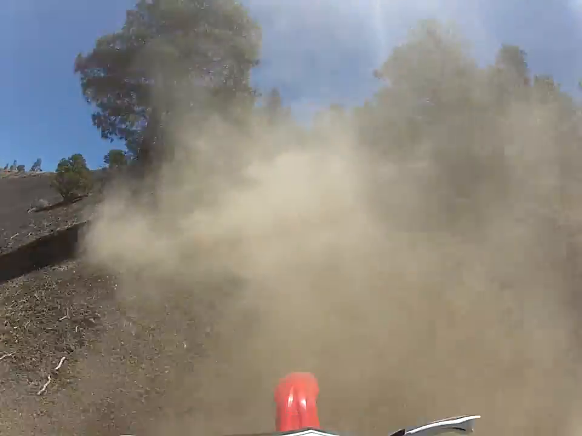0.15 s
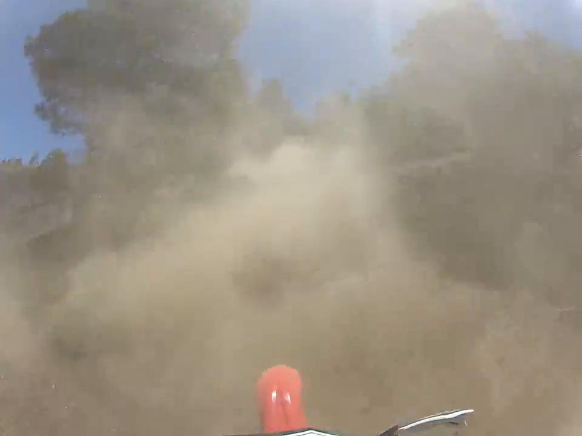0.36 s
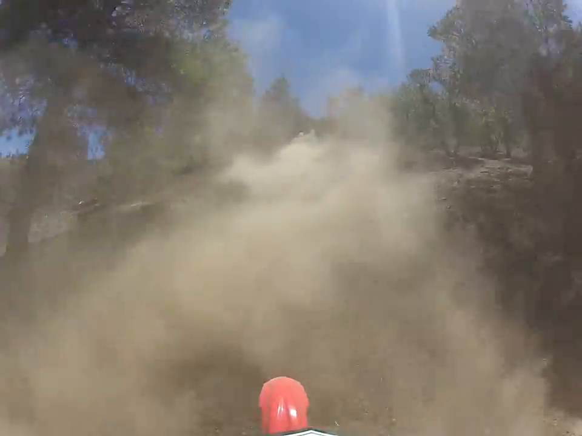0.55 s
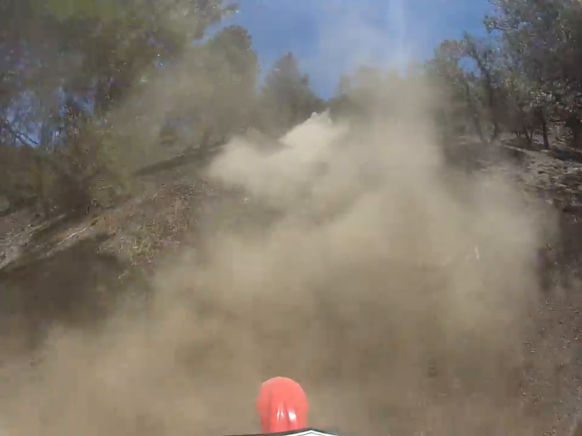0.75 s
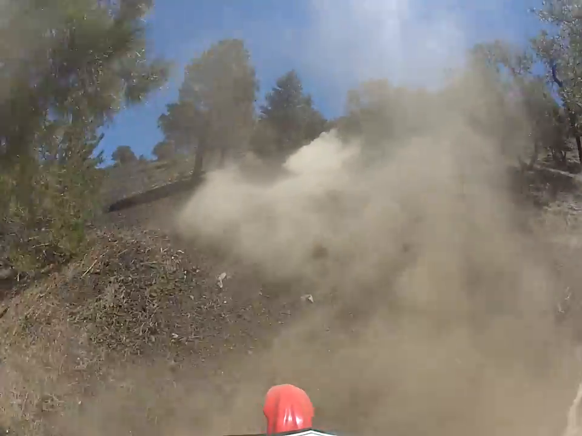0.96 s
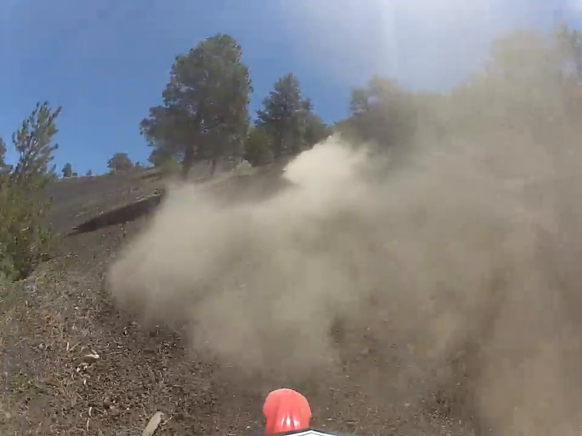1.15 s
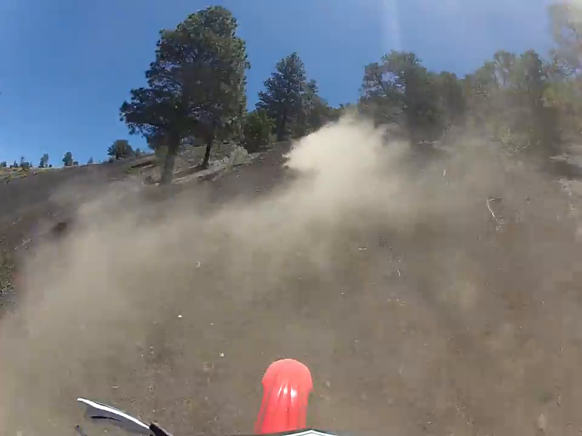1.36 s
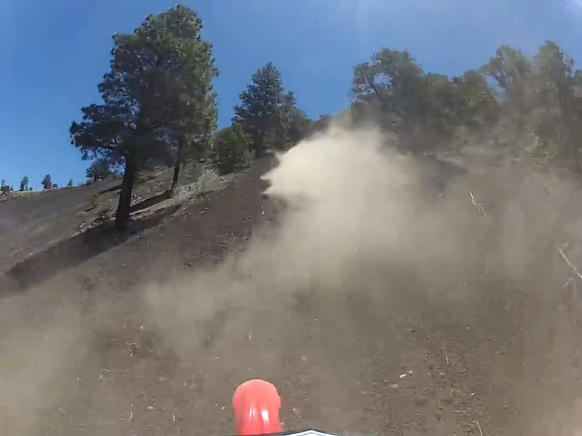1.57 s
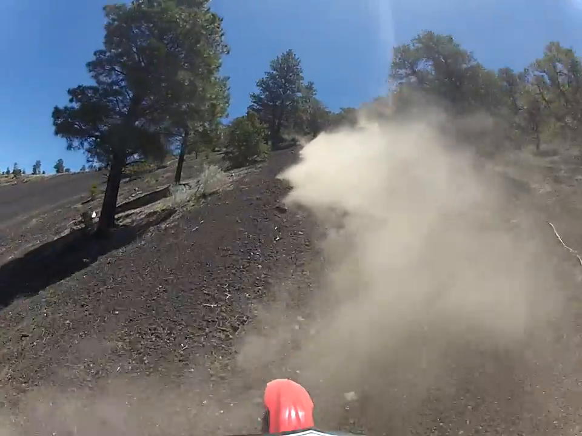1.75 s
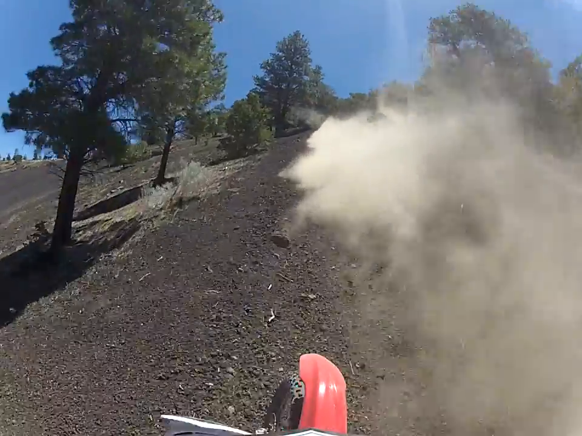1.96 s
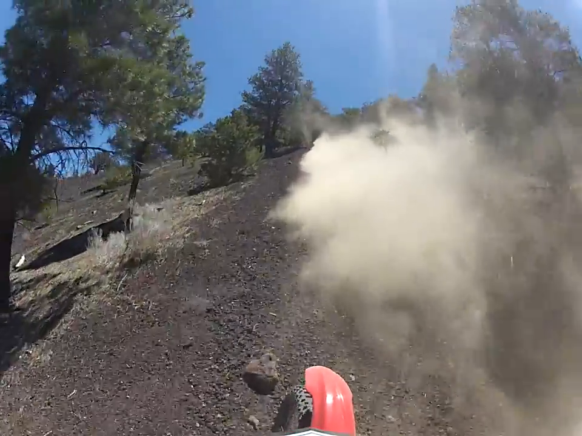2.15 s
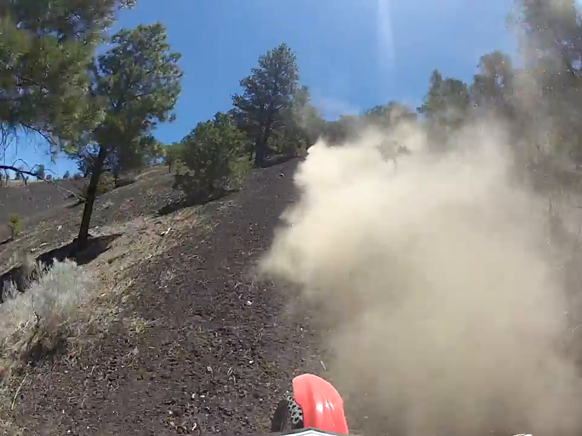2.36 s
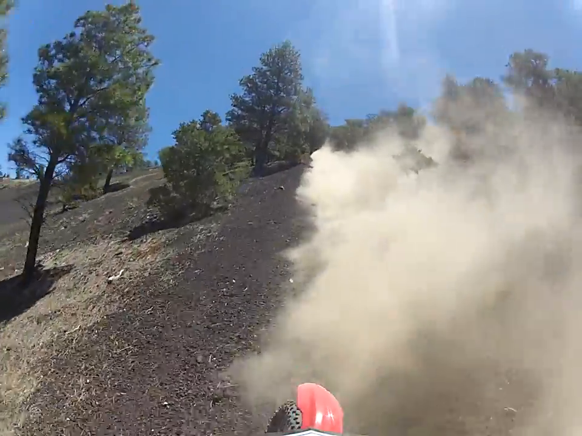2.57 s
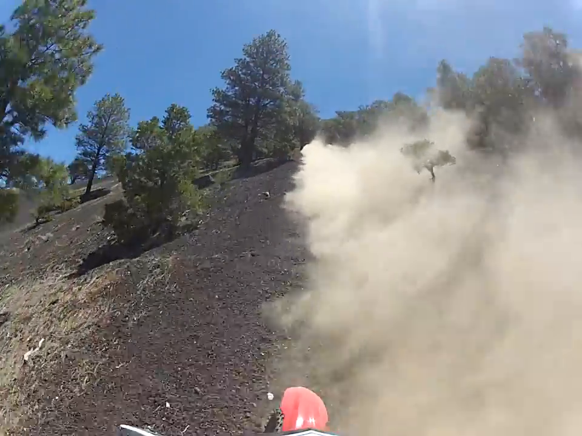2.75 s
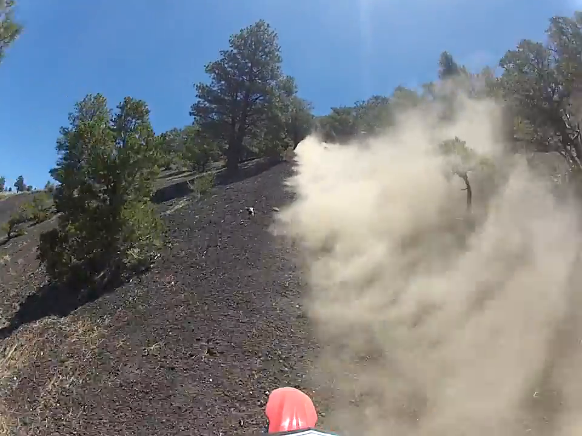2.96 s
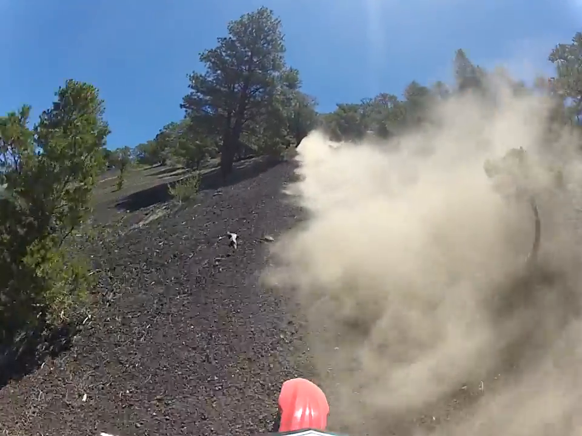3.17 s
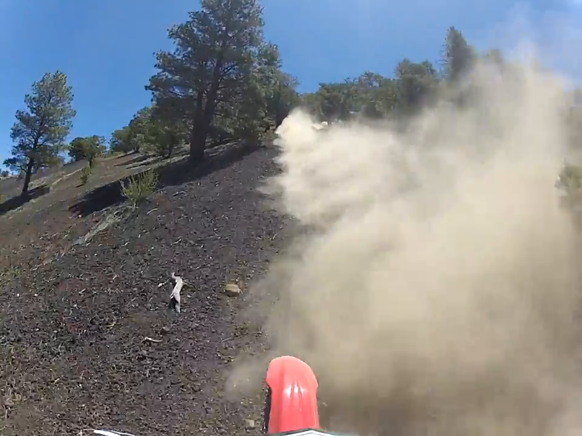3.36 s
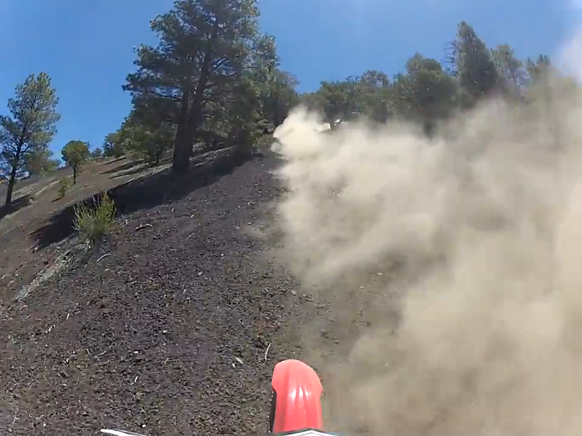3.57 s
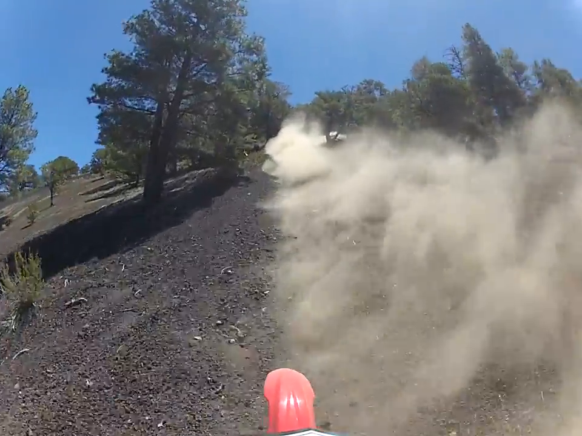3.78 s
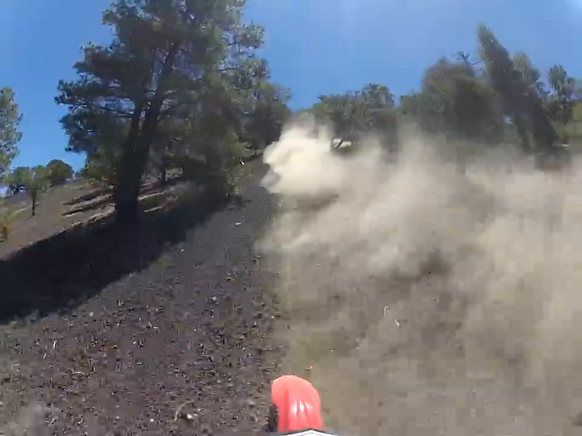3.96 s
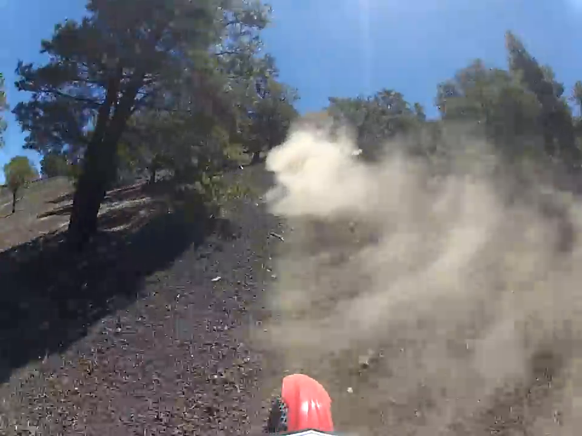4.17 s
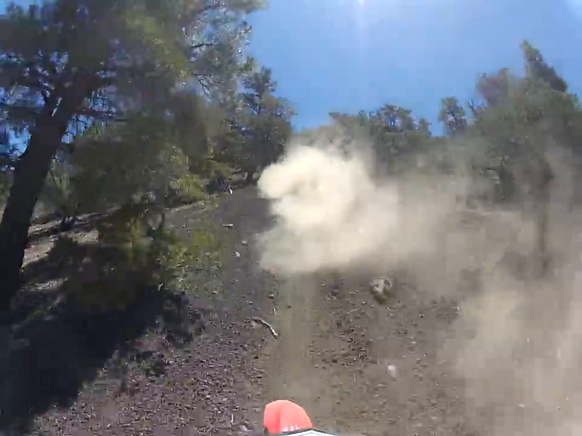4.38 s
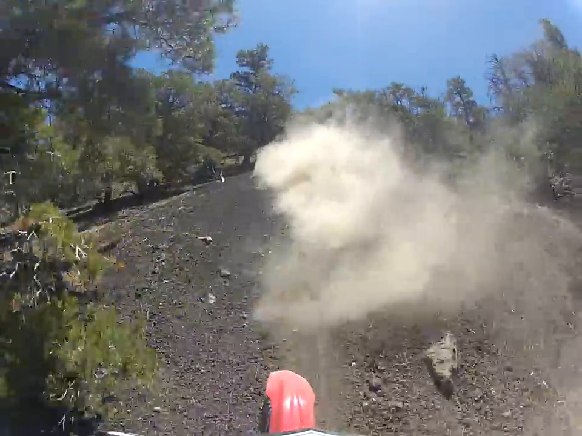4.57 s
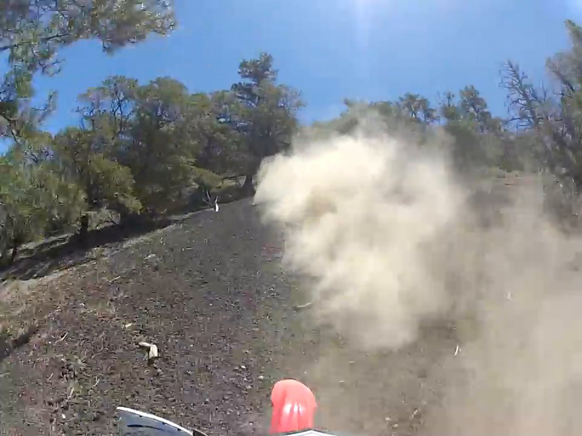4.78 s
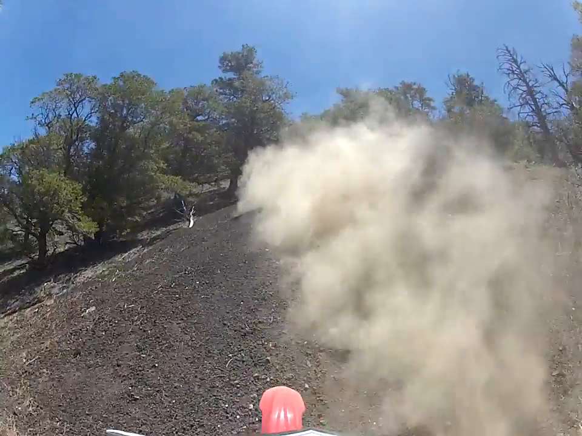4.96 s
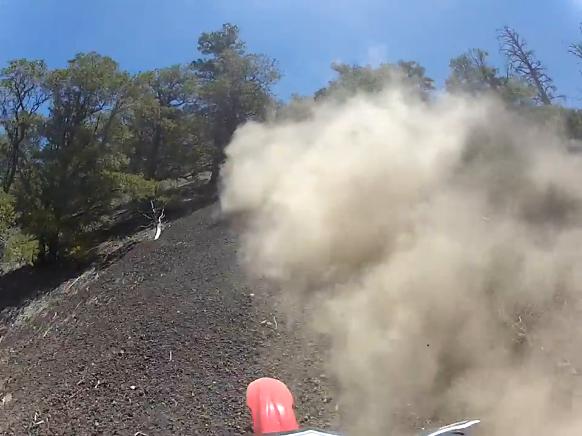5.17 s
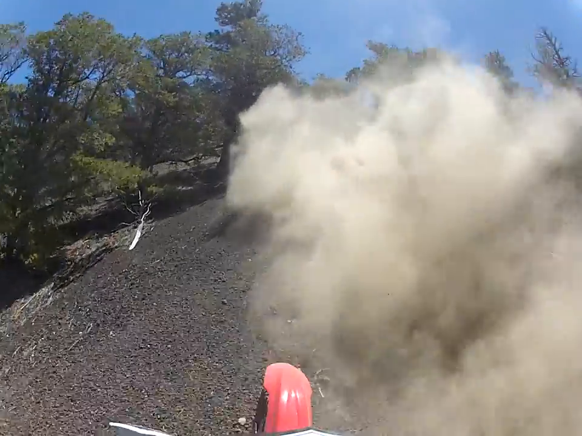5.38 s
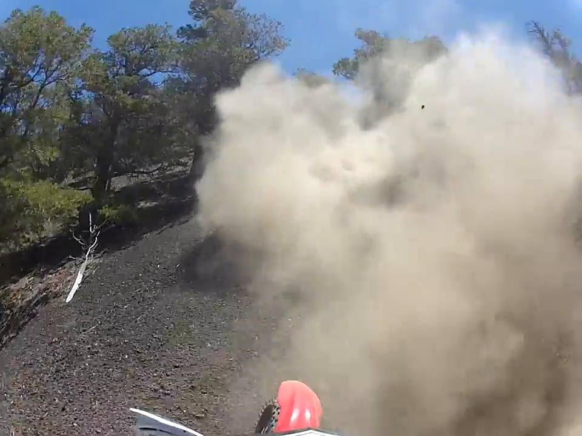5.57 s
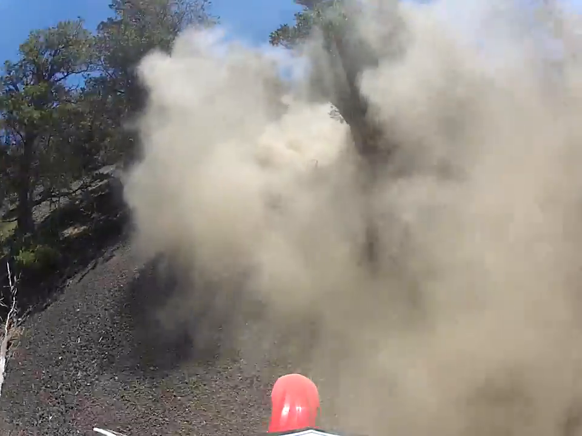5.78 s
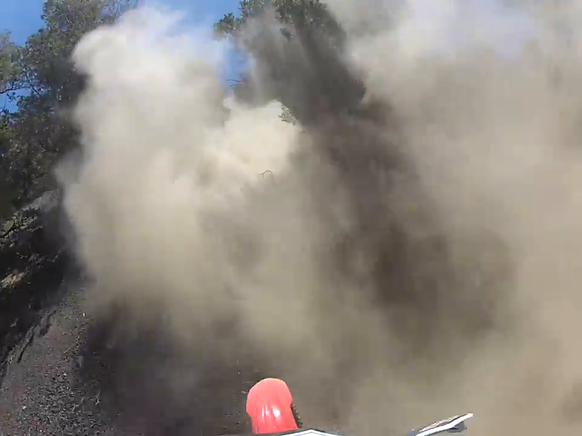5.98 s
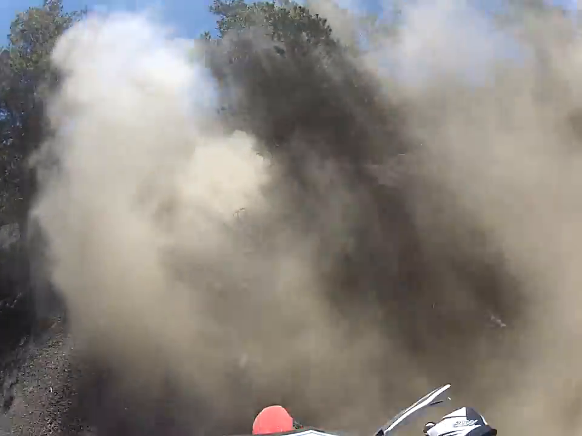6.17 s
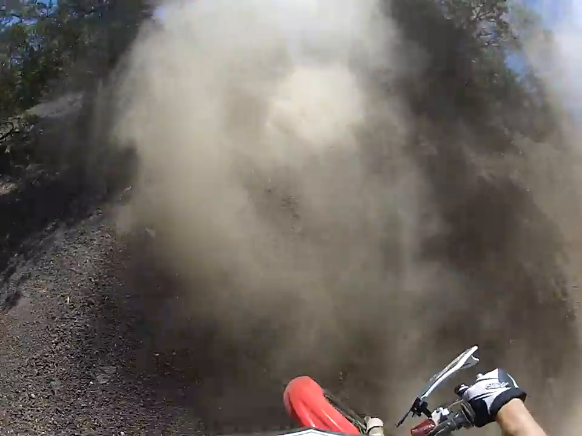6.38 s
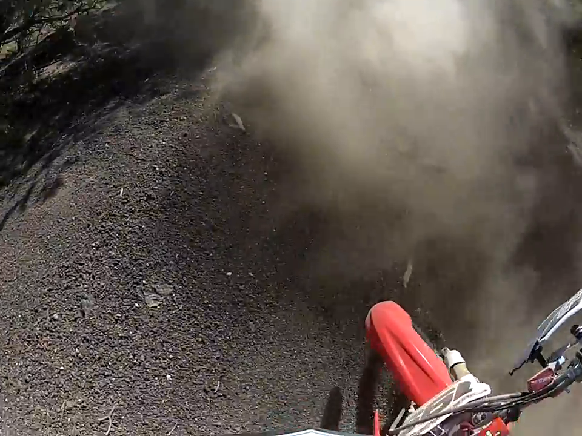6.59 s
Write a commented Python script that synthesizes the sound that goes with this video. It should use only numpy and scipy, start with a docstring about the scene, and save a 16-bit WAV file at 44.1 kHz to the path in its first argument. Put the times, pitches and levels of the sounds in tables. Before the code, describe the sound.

From 0 s a single-cylinder four-stroke dirt bike is already working hard uphill, very close to the rider's helmet microphone: a coarse rapid drone of about 60 firings a second, boomy below, honking in the middle and raspy on top with a gritty digital sizzle. It lugs lower around 0.25 s, barks harder from 0.35 to 0.8 s, rises near 0.9 s, dips at 1.8 to 2.4 s, then climbs and holds from 2.9 to 4.7 s. Faint cinder crunch and wind lie beneath. At about 4.9 s the throttle shuts abruptly; a short blip bursts at 5.1 s, then the engine drops to quiet, uneven hollow chugs, slowing and stalling by 6.2 s. Small sharp stone ticks come at 5.4 and 5.75 to 5.9 s. A second bike drones dully far ahead, rising slightly in pitch around 6.35 s. Deep wind gusts and a dull chassis thud follow near 6.4 s, with a last soft knock at 6.58 s.

```python
"""Single-cylinder motorcycle on a cinder slope

A four-stroke dirt bike labours uphill, heard from the rider's helmet; each firing booms in the pipe, honks in
the airbox and cracks out of the silencer, all as pulses exciting resonances. The throttle shuts, blips once,
and the engine runs down and stalls. A second bike drones far ahead as a dulled pulse train.
Filtered noise makes the wind and the knocks of stones and chassis; random grains make the cinders."""
import sys
import numpy as np
from scipy import signal
from scipy.fft import rfft, irfft
from scipy.io import wavfile
from scipy.ndimage import uniform_filter1d

SR = 44100
rng = np.random.default_rng(int(sys.argv[2]) if len(sys.argv) > 2 else 0)


def unload_audio(sound):
    """Save the sound as a 16-bit wav file, at the path given as the first command line argument."""
    columns = np.transpose(np.atleast_2d(sound))
    # keep every value between -1 and 1, then stretch to whole-number steps
    steps = np.round(np.clip(columns, -1, 1) * 32767)
    wavfile.write(sys.argv[1], SR, steps.astype(np.int16))


N = 292383
TIME = np.arange(N) / SR

# Crank speed, as firings per second: start_s, firing_hz
REVS = [(0.0, 55.15), (0.25, 49.83), (0.6, 59.18), (0.79, 60.31), (0.91, 63.34), (1.32, 61.8), (1.5, 59.37),
        (1.66, 61.12), (1.78, 52.39), (2.35, 54.09), (2.94, 61.24), (3.81, 59.71), (4.5, 61.05),
        (4.78, 50.54), (5.03, 33.42), (5.15, 50.49), (5.25, 39.85), (5.38, 34.1), (5.71, 36.18),
        (6.2, 17.27)]
# Load set by the throttle, relative to the opening of the climb: start_s, load_db
LOAD = [(0, 0), (.22, 0.6), (.36, 1.7), (.75, -0.8), (1.69, 0), (1.79, -3), (1.88, 1), (2.55, 0.5),
        (2.8, 1.4), (2.9, -0.5), (4.6, 0.63), (4.89, 1.5), (4.92, -17), (5.07, -3.5), (5.1, 2.5), (5.18, 3),
        (5.21, -8), (5.44, -10), (5.53, -10), (5.72, -12), (5.82, -12)]
# Hardest barks of the exhaust, before the rebound from the firing ahead: start_s, extra_db
BARKS = [(0.352, 8), (0.687, 9.5), (0.787, 8), (0.821, 5.0), (1.187, 4), (1.58, 4.5), (2.841, 3.6),
         (3.071, 3.6), (3.984, 4), (4.281, 3)]
# Response of the pipe to one firing: pitch_hz, relative_db
PIPE_COLOUR = [(45, -23), (65, -38.5), (120, -16.5), (180, -4.5), (212, 9), (238, 3.5), (275, -4.5),
               (305, -21), (365, -9), (480, -10), (545, -23), (700, -30.5), (1000, -29), (3000, -77)]
# Hollow chug of the piston pumping against a shut throttle: pitch_hz, relative_db
CHUG_COLOUR = [(40, 0.5), (70, -1.5), (105, -5.5), (138, 3), (180, 9), (230, -8), (300, 1), (360, -13),
               (800, -14), (3000, -115)]
# Airbox resonances: pitch_hz, width_hz, relative_db
AIRBOX = [(109.6, 47, -10), (284.6, 130, 3), (439, 86, -3), (688, 280, -12.5)]
# Silencer resonances: pitch_hz, width_hz, relative_db
SILENCER = [(623.5, 56, -5), (728, 47, -8), (992.4, 73, -2), (1253, 94, -2), (1613, 124, -3.5),
            (1966, 81, 2), (2640, 450, -19), (3430, 330, -35)]
# The silencer's harshest resonance, which hard firings ring most: pitch_hz, width_hz, relative_db
RASP = [(2226, 297, -2), (2283, 120, -1)]
# Colour of the gas blast: pitch_hz, relative_db
GAS_COLOUR = [(200, -35.5), (450, -30), (800, -19.5), (1250, -6), (1700, -10.5), (1970, 0), (2300, -0.5),
              (2480, -5.5), (2640, -15), (3300, -11.5), (3900, -17.5), (4650, -21.5), (5500, -21.5),
              (6000, -32.5)]
# Colour of the valve-train clatter: pitch_hz, relative_db
CLATTER_COLOUR = [(100, -7), (300, 0), (600, -13), (950, -7), (1100, -9), (1250, -2), (1450, -10),
                  (1750, -7), (1970, 2), (2130, -6), (2420, -2), (2680, -16), (3500, -17), (5800, -28)]
# Course of the clatter, before its share in the exhaust mix: start_s, relative_db
CLATTER_COURSE = [(5.2, -28.5), (5.45, -38.5), (5.85, -38.5), (6.05, -46.5), (6.4, -59)]
# Rustle of cinders under the tyres: pitch_hz, relative_db
CINDER_COLOUR = [(200, -21), (480, 5.5), (680, -13), (950, 5), (1080, -18), (1240, 5.5), (1450, -9),
                 (1780, -0.5), (1950, 8), (2150, -2), (2440, 5.5), (2650, -12), (3600, -10), (4300, -27),
                 (5800, -22)]
# Colour of the wind on the helmet: pitch_hz, relative_db
WIND_COLOUR = [(8, -20), (20, -23), (45, -25), (70, 1), (110, -9.5), (200, -28), (600, -60)]
# Gusts: peak_s, half_length_s (to 1/e), level_db
GUSTS = [(.12, 0.074, -40), (6.238, 0.074, -40), (6.45, 0.12, -39)]
# Colour of the gusts: pitch_hz, relative_db
GUST_COLOUR = [(10, 2), (25, -2), (40, 12), (70, -13), (120, -30), (400, -49.5)]
# A low pulsed drone near 70 Hz that swells around 5.6 s, then the far bike ahead: start_s, firing_hz, level_db
FAR_BIKE = [(0, 69.7, -79), (5.6, 68.65, -36.5), (6.05, 70.4, -42), (6.35, 76.9, -43), (6.63, 70, -42.5)]
# Colour of the far bike: pitch_hz, relative_db
FAR_COLOUR = [(45, -23), (72, 10.5), (140, 5), (280, 2.5), (400, -12.5), (700, -21), (1200, -25),
              (3000, -33)]
# Knocks of stones and chassis: start_s, level_db, pitch_hz, decay_s
KNOCKS = [(5.425, -32, 2730, 0.0026), (5.76, -33, 2220, 0.0026), (5.79, -30.5, 2090, 0.0031),
          (5.848, -31, 1960, 0.0038), (5.917, -32, 2260, 0.0018), (6.393, -38.5, 1270, 0.011),
          (6.429, -41, 540, 0.012), (6.429, -33, 80, 0.027), (6.58, -40, 433, 0.0093)]

FIRST_PHASE = .651  # cycles already turned at the start
CLIMB_HZ, LUG_HZ, LUG_RANGE_HZ = 60.6, 58.67, 0.39  # firing rate on the climb; below LUG_HZ the engine lugs
# Strength of each engine part at CLIMB_HZ and 0 dB load, and its rise with speed
BOOM_DB, BOOM_DB_PER_HZ = -21, 0.53
CHUG_DB, CHUG_DB_PER_HZ, CHUG_DB_PER_LOAD_DB = -15.5, 0.6, 0.69  # grows with the air let in
HONK_DB, HONK_DB_PER_HZ, HONK_LUG_DB = -33, 0.95, 14.5  # gains when the engine lugs
CRACK_DB, CRACK_DB_PER_HZ, CRACK_DB_PER_LOAD_DB = -20, 0.6428, 2.24  # answers the throttle steeply
WIND_DB, CALM_S, CALM_DB_PER_S = -43.5, 4.6, 23  # the wind dies down as the bike slows
TOP_HZ = 15600


def amp(db):
    """Level law: decibels to amplitude gain."""
    return 10 ** (np.asarray(db) / 20)


def unit(x):
    """Power normalisation: scale to an rms of one."""
    return x / np.sqrt(np.mean(x ** 2))


def curve(table, at=TIME):
    """Linear interpolation: the columns of a table, read at the given times."""
    s, *columns = np.transpose(table)
    return [np.interp(at, s, column) for column in columns]


def response(points, size=4096):
    """Minimum phase: folding the cepstrum makes a causal impulse response of a given colour."""
    hz, db = np.transpose(points)
    bins_hz = np.arange(size // 2 + 1) * SR / size
    db_at_bins = np.interp(np.log(bins_hz + 1), np.log(hz), db)
    cepstrum = irfft(np.log(amp(db_at_bins)))
    cepstrum[1:size // 2] *= 2
    cepstrum[size // 2 + 1:] = 0
    return irfft(np.exp(rfft(cepstrum)))


def resonances(modes, size=4096):
    """Modal superposition: steep resonances that swell before they ring down."""
    t = TIME[:size]
    total = 0
    for hz, width, db in modes:
        envelope = width ** 2 * t * np.exp(-np.pi * width * t)
        total = total + amp(db) * envelope * np.sin(2 * np.pi * hz * t)
    return total


def ring(x, impulse):
    """Linear filtering: convolve a signal with an impulse response scaled to unit energy."""
    return signal.fftconvolve(x, impulse / np.linalg.norm(impulse))[:N]


def noise(points):
    """Spectral shaping: coloured noise with an rms of one."""
    return unit(ring(rng.standard_normal(N), response(points)))


def walk(rate_hz):
    """Slow fluctuation: random steps smoothed by a moving average, with an rms of one."""
    hold = int(SR / rate_hz)
    steps = np.repeat(rng.standard_normal(N // hold + 1), hold)
    return unit(uniform_filter1d(steps, hold)[:N])


def pulses(times, sizes):
    """Fractional delay: each click is shared between two neighbouring samples."""
    place = np.clip(times * SR, 0, N)
    i = place.astype(int)
    late_share = place - i
    early = np.bincount(i, sizes * (1 - late_share), N + 2)
    late = np.bincount(i + 1, sizes * late_share, N + 2)
    return early[:N] + late[:N]


def firing_times(hz):
    """Phase integration: a firing falls wherever the summed rate completes a cycle."""
    phase = FIRST_PHASE + np.cumsum(hz) / SR
    return np.interp(np.arange(1, phase[-1]), phase, TIME)


def effort_db(times, base_db, db_per_hz, per_load=1):
    """Source strength: a part of the engine grows louder with load and with crank speed."""
    speed_db = db_per_hz * (curve(REVS, times)[0] - CLIMB_HZ)
    return base_db + per_load * curve(LOAD, times)[0] + speed_db


def lugging(times):
    """Soft threshold: 0 while the engine keeps its revs, 1 well below its lugging speed."""
    return .5 + .5 * np.tanh((LUG_HZ - curve(REVS, times)[0]) / (2 * LUG_RANGE_HZ))


def barks(times, chance, scatter_db=2.12, rebound=0.22):
    """Uneven combustion: extra dB of each firing, where a hard one leaves the next weaker."""
    extra = scatter_db * np.minimum(chance, 1.6)
    for s, db in BARKS:
        extra[np.argmin(abs(times - s))] = db
    return extra - rebound * np.append(0, extra[:-1])


def pipe(times, weight, shut_db=-6, scatter_db=-1.0, jitter_s=.00006, return_share=0.35,
         chug_scatter_db=3.0, chug_jitter_s=0.00044):
    """Pulsed pipe: firings boom under load; on a shut throttle the piston chugs unevenly, twice a cycle."""
    chance = rng.standard_normal((len(times), 6)).T
    size = weight * amp(effort_db(times, BOOM_DB, BOOM_DB_PER_HZ) + scatter_db * chance[0])
    burning = 1 / (1 + amp(shut_db - curve(LOAD, times)[0]) ** 8)  # near 1 under load, near 0 when shut
    booms = pulses(times + jitter_s * chance[1], size * burning)
    chug_db = effort_db(times, CHUG_DB, CHUG_DB_PER_HZ, CHUG_DB_PER_LOAD_DB)
    pumped = weight * (1 - burning) * amp(chug_db + chug_scatter_db * chance[2:4])
    strokes = times + chug_jitter_s * chance[4:6]
    half_cycle = np.gradient(times) / 2
    chugs = pulses(strokes[0], pumped[0]) + return_share * pulses(strokes[1] + half_cycle, pumped[1])
    return ring(booms, response(PIPE_COLOUR)) + ring(chugs, response(CHUG_COLOUR))


def airbox(times, weight, scatter_db=1.5, jitter_s=.00004, shut_db=-38):
    """Cavity resonance: each gulp of air honks, most when the engine lugs; a shut throttle chokes it."""
    chance = rng.standard_normal((len(times), 2)).T
    db = effort_db(times, HONK_DB, HONK_DB_PER_HZ) + HONK_LUG_DB * lugging(times)
    choke = 1 / np.sqrt(1 + amp(shut_db - db) ** 2)
    size = weight * amp(db + scatter_db * chance[0]) * choke
    return ring(pulses(times + jitter_s * chance[1], size), resonances(AIRBOX))


def gas_puff(swell_s=0.00082, echo_s=0.004, echo_db=-12, tail_s=0.14, tail_db=-16):
    """Blowdown envelope: the blast swells, surges a second time and keeps a low tail, cut at 25 ms."""
    t = TIME[:SR // 40]
    swell = (t / swell_s) ** 2 * np.exp(2 - 2 * t / swell_s)
    surge = amp(echo_db) * np.interp(t - echo_s + swell_s, t, swell)  # peaks at echo_s
    puff = swell + surge + amp(tail_db) * np.exp(-t / tail_s)
    return puff / np.linalg.norm(puff)


def exhaust(times, weight, bounce_s=.0046, bounce_db=-12, ring_db=-7.5, ring_lug_db=3, rasp_db=-2.5,
            gas_db=-3.0, jitter_s=.00005, gas_lead_s=.0004, clatter_db=-1):
    """Step excitation: pressure rings the silencer with a blast of gas, over valve-train clatter."""
    chance = rng.standard_normal((len(times), 2)).T
    extra = barks(times, chance[0])
    size = weight * amp(effort_db(times, CRACK_DB, CRACK_DB_PER_HZ, CRACK_DB_PER_LOAD_DB))
    steps = times + jitter_s * chance[1]
    rung_size = size * amp(extra / 2 + ring_lug_db * lugging(times))
    rung = ring(pulses(steps, rung_size), resonances(SILENCER))
    rasp = ring(pulses(steps, size * amp(extra)), resonances(RASP))
    # the step runs the pipe once more
    rasp = rasp + amp(bounce_db) * np.interp(TIME - bounce_s, TIME, rasp, left=0)
    blast = signal.fftconvolve(pulses(times - gas_lead_s, size * amp(extra / 2)), gas_puff())[:N]
    gas = ring(blast * rng.standard_normal(N), response(GAS_COLOUR))
    # the clatter flickers about a steady level on the climb and dies away as the crank stops
    clatter = noise(CLATTER_COLOUR) * amp(curve(CLATTER_COURSE)[0] + 2.5 * walk(250))
    return amp(ring_db) * rung + amp(rasp_db) * rasp + amp(gas_db) * gas + amp(clatter_db) * clatter


def engine(crack_lag_s=0.001275, intake_lead_s=0.0027):
    """Common excitation: one cylinder's firings drive pipe, airbox and exhaust until the crank stops."""
    hz, = curve(REVS)
    times = firing_times(hz)
    times = times[times < REVS[-1][0]]
    weight = np.sqrt(SR / curve(REVS, times)[0])  # slower firings carry more energy each
    intake = airbox(times - intake_lead_s, weight)
    return pipe(times, weight) + intake + exhaust(times + crack_lag_s, weight)


def cinders(level_db=-45, grain_db=4, count=9000, flicker_db=2.35, flicker_hz=27):
    """Granular superposition: countless small stones of either sign crunch under the tyres."""
    chance = rng.random((count, 2)).T
    grain_size = amp(grain_db * np.minimum(rng.exponential(size=count), 4))
    grains = pulses(chance[0] * N / SR, np.sign(chance[1] - .5) * grain_size)
    crunch = unit(ring(grains, response(CINDER_COLOUR)))
    return crunch * amp(level_db + flicker_db * walk(flicker_hz))


def wind(side_db=-8, gust_side_db=-5, buffet_db=3, buffet_hz=16):
    """Turbulent pressure: wind buffets the helmet, a little differently each side, with deep gusts."""
    sides = np.array([[1], [-1]])
    calm_db = CALM_DB_PER_S * np.maximum(TIME - CALM_S, 0)
    steady = amp(WIND_DB - calm_db + buffet_db * np.tanh(walk(buffet_hz)))
    gusts = sum(amp(db) * np.exp(-((TIME - s) / length) ** 2) for s, length, db in GUSTS)
    rumble = noise(WIND_COLOUR) + amp(side_db) * sides * noise(WIND_COLOUR)
    thump = noise(GUST_COLOUR) + amp(gust_side_db) * sides * noise(GUST_COLOUR)
    return steady * rumble + gusts * thump


def far_bike(scatter_db=3, jitter_s=0.00053):
    """Filtered pulse train: a dulled drone that swells around 5.6 s, then the firings of the bike ahead, dulled
    by distance."""
    hz, db = curve(FAR_BIKE)
    times = firing_times(hz)
    chance = rng.standard_normal((len(times), 2)).T
    firings = pulses(times + jitter_s * chance[0], amp(scatter_db * chance[1]))
    return unit(ring(firings - firings.mean(), response(FAR_COLOUR))) * amp(db)


def knocks(skirt_db=-18):
    """Damped impact: short dead bursts of noise, each centred on its own pitch."""
    out = np.zeros(N)
    for s, db, hz, decay in KNOCKS:
        age = np.maximum(TIME - s, 0)
        envelope = (TIME > s) * np.exp(-age / decay)
        colour = [(hz / 8, -40), (hz / 2, skirt_db), (hz, 0), (hz * 2, skirt_db), (hz * 8, -55)]
        out += amp(db) * envelope * noise(colour)
    return out


def scene():
    """Linear superposition: all sources add, and only the wind has width."""
    return engine() + cinders() + wind() + far_bike() + knocks()


def record(dry):
    """Sample-and-hold imaging: values held at 12 kHz mirror the crack to a sizzle near 10 and 14 kHz."""
    slow = signal.resample_poly(dry, 40, 147, axis=1, window=("kaiser", 7)).clip(-.9, .9)
    held = np.repeat(slow, 4, axis=1)  # now at 48 kHz
    held = signal.resample_poly(held, 147, 160, axis=1)[:, :N]
    lowpass = signal.ellip(8, .2, 70, TOP_HZ, fs=SR, output="sos")
    return signal.sosfilt(lowpass, held)


dry = scene()
out = record(dry)
unload_audio(out)
```